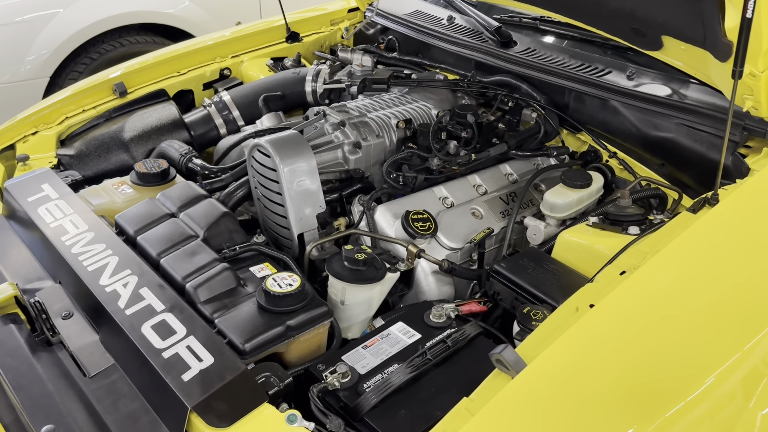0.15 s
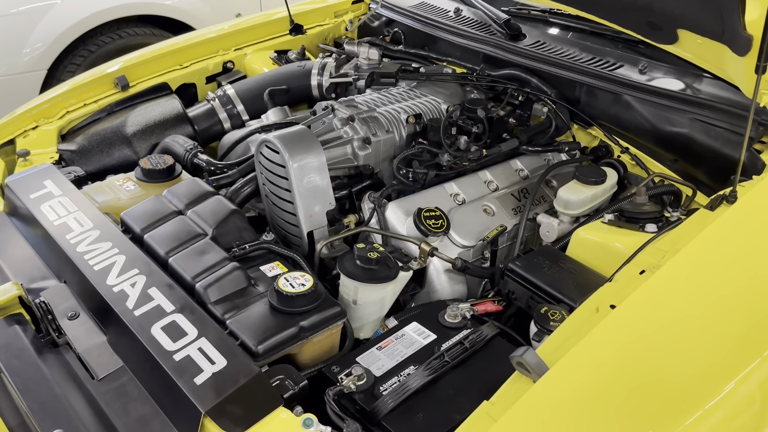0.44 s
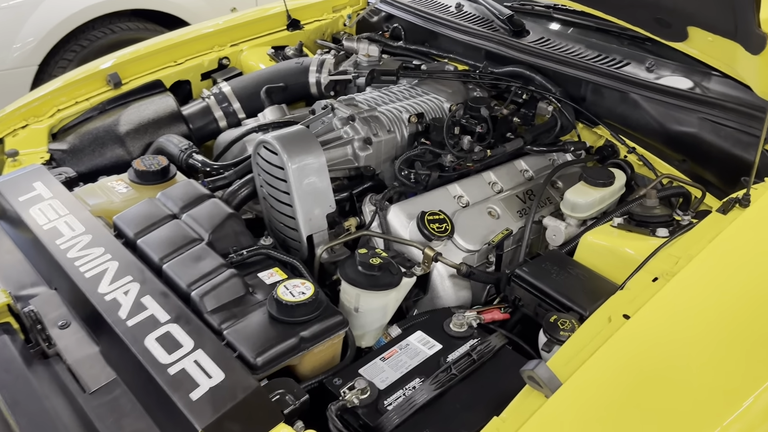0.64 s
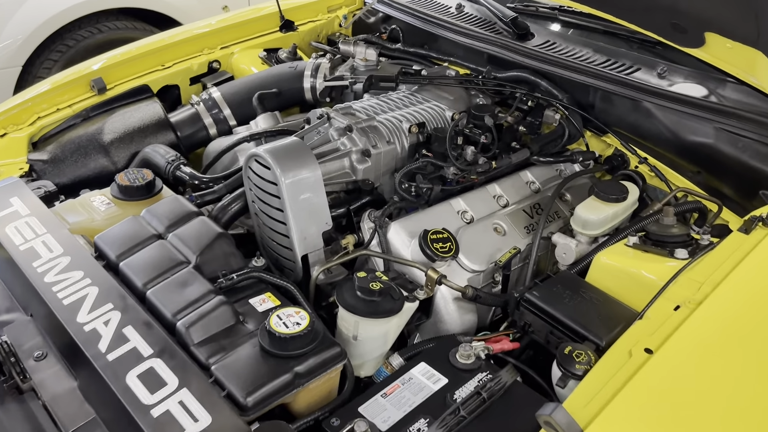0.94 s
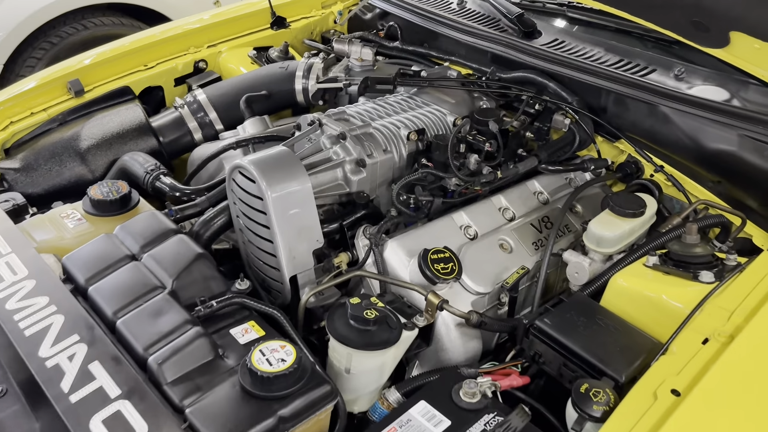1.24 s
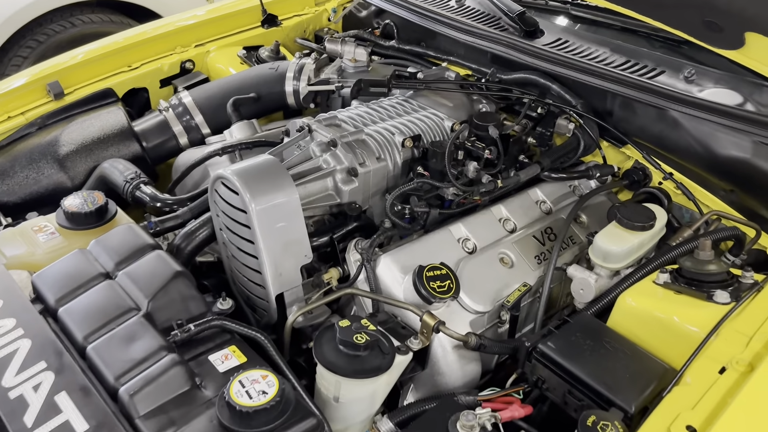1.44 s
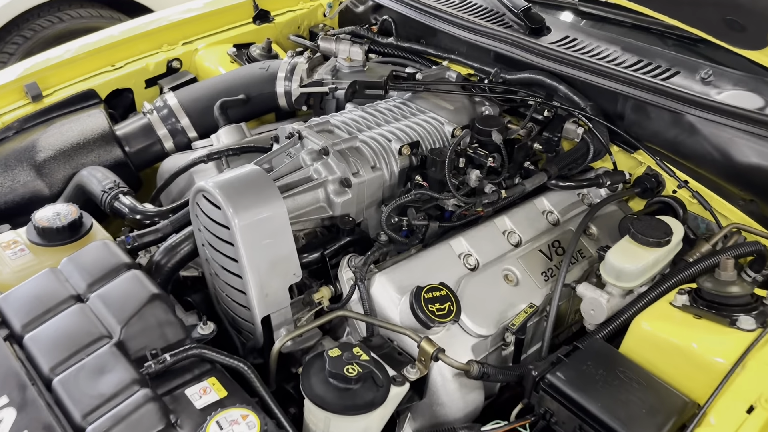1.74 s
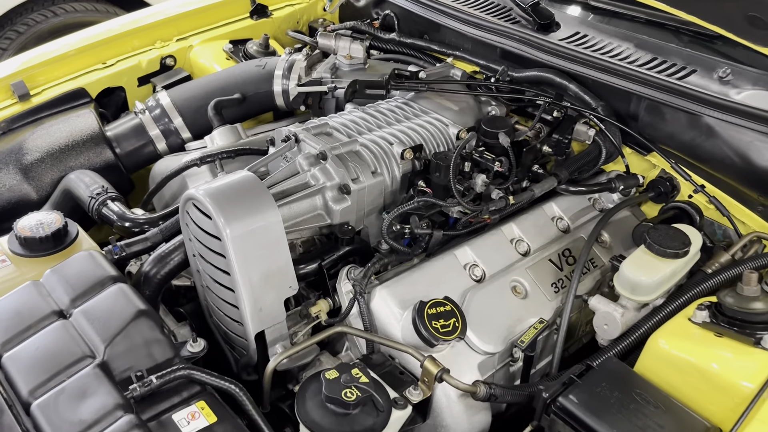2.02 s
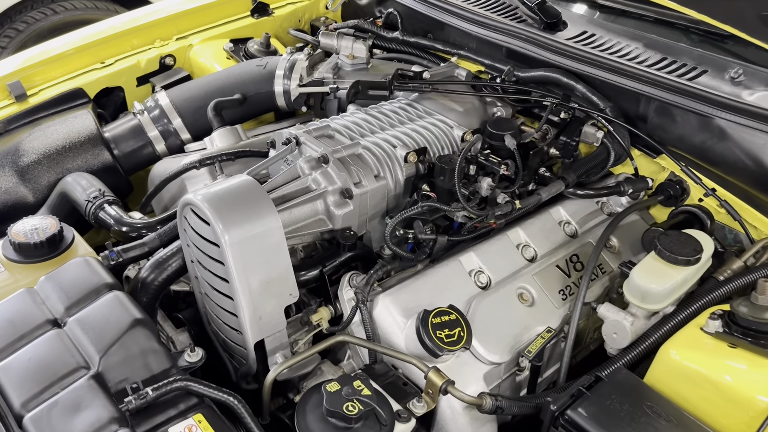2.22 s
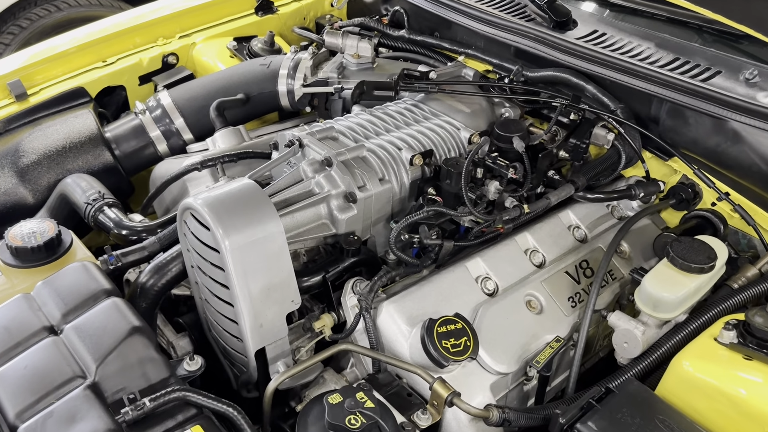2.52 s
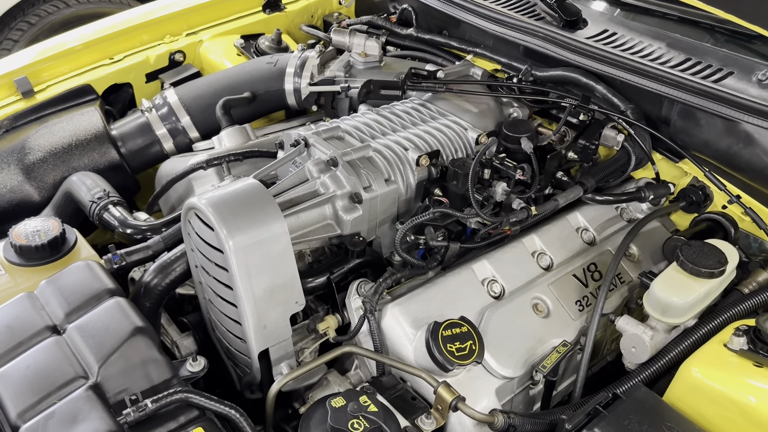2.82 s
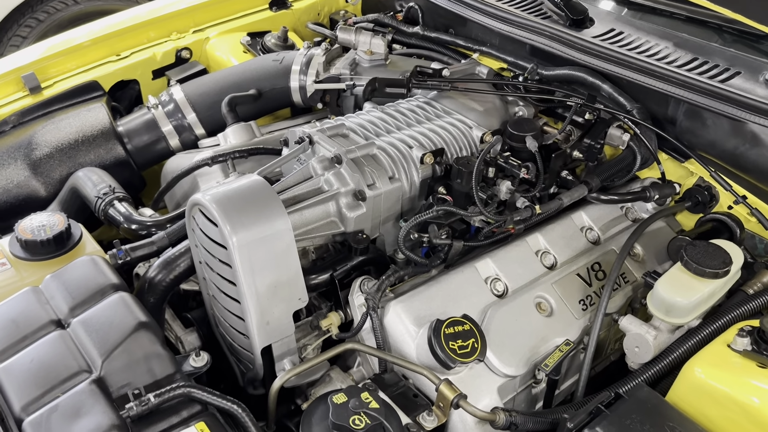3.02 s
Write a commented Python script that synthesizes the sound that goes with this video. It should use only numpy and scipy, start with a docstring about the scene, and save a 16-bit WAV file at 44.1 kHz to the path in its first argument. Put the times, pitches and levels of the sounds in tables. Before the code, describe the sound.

An eight-cylinder car engine drops from fast idle to slow idle, rumbling, whirring and ticking.

```python
"""In a closed garage, heard over the open bay, an eight-cylinder engine sinks from fast to slow idle.
Exhaust orders are sines sliding through pipe resonances, with a low room hum beside them.
Fan, belts and intake are coloured noise; random knocks ring the housings; injectors are bright bursts.
A belt-driven whine falls with the speed, and late knocks ring the valve cover.
Two close microphone ports give the treble a phase twist."""
import sys
import numpy as np
from scipy import signal
from scipy.fft import rfft, irfft, next_fast_len
from scipy.io import wavfile

SR = 44100
rng = np.random.default_rng(int(sys.argv[2]) if len(sys.argv) > 2 else 0)


def pcm_store(signal):
    """Save signal as 16-bit PCM."""
    levels = np.round(np.clip(np.atleast_2d(signal), -1, 1) * 32767)
    wavfile.write(sys.argv[1], SR, levels.astype(np.int16).T)


def gain_from_db(level_db):
    """Convert decibel levels to linear amplitude factors (20 dB per decade)."""
    decades = np.asarray(level_db, float) / 20
    return 10 ** decades


N = 139797
LEFT_RIGHT = np.array([[.5], [-.5]])  # splits a left-minus-right difference evenly


def rms_one(x):
    """Normalization: scale to rms 1."""
    return x / np.sqrt(np.mean(x ** 2) + 1e-20)


def in_time(rows):
    """Linear interpolation: table columns joined by straight lines, per sample."""
    s, *columns = np.transpose(rows)
    return [np.interp(np.arange(N) / SR, s, c) for c in columns]


def at_hz(points, hz):
    """Logarithmic pitch scale: read a spectrum by straight lines over log frequency."""
    p = np.array(points)
    return np.interp(np.log(np.maximum(hz, 1)), np.log(np.maximum(p[:, 0], 1)), p[:, 1])


def drift(corner_hz):
    """Low-passed noise: a slow random wander about zero, of rms 1."""
    step = 40  # samples between drawn values
    r = np.exp(-2 * np.pi * corner_hz * step / SR)
    noise = rng.standard_normal(N // step + 2002)
    slow = signal.lfilter([1], [1, -2 * r, r * r], noise)[2000:]  # filter start-up left out
    return np.interp(np.arange(N) / step, np.arange(len(slow)), rms_one(slow))


# coherence of the two ports: pitch_hz [Hz], alike [share of power]
PORTS_ALIKE = [(60, 0.99), (140, 0.96), (250, 0.71), (500, 0.78), (1000, 0.66), (2000, 0.37), (4000, 0.56),
               (6500, 0.26), (8000, 0.54), (9500, 0.78)]
# the same for the highest treble, almost fully shared: pitch_hz [Hz], alike [share of power]
PORTS_ALIKE_TOP = [(10500, .99), (13500, 1), (16000, 1)]
# phase difference of the ports: pitch_hz [Hz], left_lead [radians]
PORT_TWIST = [(0, 0), (1120, 0.74), (2500, 7.5), (4740, 7), (7060, 8), (7410, 12), (8180, 11), (8870, 12),
              (9600, 11)]
# the same for the highest treble: pitch_hz [Hz], left_lead [radians]
PORT_TWIST_TOP = [(10400, 10.3), (11250, 9.425), (11900, 8.8), (13900, 6.33), (15100, 6.26), (15500, 5.5),
                  (16500, 5.6)]
# level difference of the ports: pitch_hz [Hz], left_minus_right_db [dB]
PORT_BALANCE = [(60, 2), (130, 3), (290, -2), (640, 3), (1410, 2), (3100, -0.5), (6820, 2.5), (15000, -1)]


def at_ports(near, scattered, spectrum):
    """Partial coherence: colour a source, twist its phase between ports, replace part by scattered sound."""
    size = next_fast_len(N)
    hz = np.arange(size // 2 + 1) * SR / size
    alike = np.clip(at_hz(PORTS_ALIKE + PORTS_ALIKE_TOP, hz), 0, 1)
    twist = np.interp(hz, *np.transpose(PORT_TWIST + PORT_TWIST_TOP))
    shared = np.sqrt(alike) * rfft(near, size) * np.exp(1j * LEFT_RIGHT * twist)
    separate = np.sqrt(1 - alike) * rfft(scattered, size)
    balance_db = at_hz(PORT_BALANCE, hz) * (hz < 9500)
    colour = gain_from_db(at_hz(spectrum, hz) + LEFT_RIGHT * balance_db)
    return irfft((shared + separate) * colour, size)[:, :N]


# resonances of exhaust pipe and garage: pitch_hz [Hz], gain_db [dB]
PIPE_RESPONSE = [(30, 21.5), (45, -13), (70, -24), (88, -1), (100, 10.5), (112, 6.5), (125, 4), (140, -4),
                 (155, -7.5), (168, -6), (178, 1.5), (186, 10), (195, 10), (205, 7.5), (218, 1), (232, 4),
                 (250, -3.5), (270, -0.1), (290, 1.5), (303, 2.7), (330, -18), (480, -6.5)]


def pipe_phase(hz):
    """Minimum phase: a causal pipe's phase is the Hilbert transform of its log gain."""
    grid_hz = np.arange(-1024, 1024)
    log_gain = np.log(gain_from_db(at_hz(PIPE_RESPONSE, abs(grid_hz))))
    return -np.interp(hz, grid_hz, signal.hilbert(log_gain).imag)


# exhaust as heard while the microphone moves:
# start_s [s], firing_db [dB], second_harmonic_db [dB], others_db [dB added to all the other orders]
EXHAUST_LEVEL = [(0, -13.5, -29, 3.5), (.15, -40, -19.5, 0.5), (.22, -47, -30, 2), (.28, -18.5, -28, 3),
                 (.35, -37, -30, 2), (.6, -31, -26.5, -1.5), (1.1, -35, -29.5, -1.5), (1.35, -36, -22, -3),
                 (1.6, -34.5, -19.5, -2.5), (2.2, -31, -17, -2), (2.55, -47, -18, -2),
                 (3.17, -47, -17.5, -1)]
# exhaust bank of each firing in turn: bank [+1 or -1]
FIRING_BANK = [1, -1, 1, 1, -1, 1, -1, -1]
# the other exhaust orders, uneven-firing ones and higher firing harmonics:
# order [periods per engine cycle]
OTHER_ORDER = [5, 9, 10, 11, 12, 13, 14, 15, 17, 18, 19, 20, 21, 22, 23, 24, 25, 26, 27, 28, 29, 32]
# their levels before the pipe response: level_db [dB]
OTHER_ORDER_DB = [-38.5, -40, -41.5, -41, -56, -37, -44.5, -63, -54, -51.5, -34.5, -50, -31, -43, -46.5,
                  -38, -44, -49, -35.5, -59, -36, -36.5]
BANK_SHARE, START_CYCLE = .45, 0.1276  # bank imbalance (ratio), starting offset (cycles)
WAVER_DB, WAVER_RAD, WAVER_HZ = 1.5, .25, 5  # rms level and phase waver of the other orders, its corner
SMEAR_RAD = 0.02523  # pipes spread each pulse: phase lag grows with the square of the order


def exhaust(rate, cycle, firing_db, second_db, others_db):
    """Fourier series: sines at cycle orders, phased by the two banks, wavering apart at the ports."""
    bank_phase = np.angle(np.fft.fft(1 + BANK_SHARE * np.array(FIRING_BANK)))
    orders = [(8, firing_db, 0.098), (16, second_db, 0.16)]  # order, level, share of the waver
    for order, db in zip(OTHER_ORDER, OTHER_ORDER_DB):
        orders.append((order, db + others_db + at_hz(PIPE_RESPONSE, order * rate / 8), 1))
    out = np.zeros((2, N))
    for order, db, waver in orders:
        hz = order * rate / 8
        phase = 2 * np.pi * order * (cycle - START_CYCLE) + bank_phase[order % 8]
        phase += pipe_phase(hz) - SMEAR_RAD * order ** 2
        phase += waver * WAVER_RAD * drift(WAVER_HZ)
        gain = np.sqrt(2) * gain_from_db(db + waver * WAVER_DB * drift(WAVER_HZ))
        apart = np.sqrt(1 - np.clip(at_hz(PORTS_ALIKE, hz), 0, 1)) * drift(2.25)
        out -= gain * np.cos(phase + apart * LEFT_RIGHT)
    return out


# the garage hums on one note while firings pass near it: start_s [s], level_db [dB]
BOOM_LEVEL = [(0, -15), (0.154, -11.5), (.178, -45), (.28, -13), (.34, -42), (.5, -67)]
BOOM_HZ = 98


def boom():
    """Room mode: a low air resonance of fixed pitch, a sine that swells and fades."""
    level_db, = in_time(BOOM_LEVEL)
    seconds = np.arange(N) / SR - .0024
    return -np.sqrt(2) * gain_from_db(level_db) * np.cos(2 * np.pi * BOOM_HZ * seconds)


# rush level and balance, each also followed elsewhere about its mean:
# start_s [s], level_db [dB before RUSH_DB], left_minus_right_db [dB before its mean is removed]
BAY_LEVEL = [(0.0, -28, 7), (0.26, -31, 6.5), (1.27, -33, 6), (2.3, -31.5, 6.5), (3.17, -31, 7)]
# colour of fan, belts and intake: pitch_hz [Hz], fast_idle_db, slow_idle_db [relative dB per Hz]
RUSH_COLOUR = [(25, -32, -30), (45, -38, -23), (70, 6, -12), (100, 5, -6), (140, 10.5, 5), (189, 13, -4),
               (240, 5, -6.5), (320, -4, -7.5), (450, 3.5, -6), (614, -1, 0), (750, -8, -5),
               (1040, -4, -7.5), (1570, -6.5, -5), (1860, -10.5, -17.5), (2520, -14, -12.5),
               (3970, -13.5, -16), (4570, -17, -19), (5700, -21, -20), (7100, -21.5, -17.5),
               (8460, -20.5, -21.5), (10900, -27.5, -25.5), (14000, -23.5, -25), (16000, -26, -19)]
RUSH_DB, RUSH_THROB = -0.5, 0.032  # level trim (dB), depth of the throb (ratio)


def rush(rate, cycle):
    """Amplitude-modulated turbulence: noise throbs faintly at each firing, its colour following speed."""
    throb = 1 + RUSH_THROB * np.cos(2 * np.pi * 8 * cycle)
    noise = rng.standard_normal((3, N)) * throb
    fast = np.sqrt((rate - rate.min()) / np.ptp(rate))
    colour = np.array(RUSH_COLOUR)
    sound = fast * at_ports(noise[0], noise[1:], colour[:, :2])
    sound += (1 - fast) * at_ports(noise[0], noise[1:], colour[:, ::2])
    midband = signal.butter(4, [400, 7000], "band", fs=SR, output="sos")
    reference = np.std(signal.sosfilt(midband, sound.mean(0)))  # levels refer to this band
    return sound / reference * gain_from_db(in_time(BAY_LEVEL)[0] + RUSH_DB)


# covers and housings that the valve gear keeps ringing:
# pitch_hz [Hz], width_hz [Hz], level_db [dB before the port balance and the level curve]
HOUSING_MODES = [(300, 13.5, -39), (483.6, 13.4, -45.5), (605, 25, -45), (745, 36, -43), (867, 38, -43.5),
                 (1410, 45, -60), (1872, 36, -47.5), (2560, 34, -49.5), (3206, 55, -51), (4717, 69, -53.5),
                 (8210, 67, -52.5)]
KNOCKS_PER_S, CLATTER_SLOPE_DB_PER_S = 200, -0.5  # mean knock rate, steady fall in level


def clatter():
    """Modal resonance: dense random knocks of uneven strength ring each housing."""
    out = np.zeros((3, N))
    for hz, width_hz, db in HOUSING_MODES:
        struck = rng.random((3, N)) < KNOCKS_PER_S / SR
        knocks = struck * rng.standard_normal((3, N)) * gain_from_db(drift(6.8))  # 1 dB rms slow variation
        r = np.exp(-np.pi * width_hz / SR)
        poles = [1, -2 * r * np.cos(2 * np.pi * hz / SR), r * r]
        out += gain_from_db(db) * rms_one(signal.lfilter([1, 0, -1], poles, knocks + 1e-18))
    level_db = in_time(BAY_LEVEL)[0]
    slope_db = CLATTER_SLOPE_DB_PER_S * (np.arange(N) - N / 2) / SR
    flat = [(20, 0), (20000, 0)]
    return at_ports(out[0], out[1:], flat) * gain_from_db(level_db - level_db.mean() + slope_db)


# whine strength before its random wobble: start_s [s], level_db [dB]
WHINE_STRENGTH = [(0, -42), (.05, -39), (.11, -58), (.17, -35), (.2, -46), (.36, -45), (.52, -47),
                  (.6, -60), (.67, -45), (.9, -51), (1.5, -54.5), (2.3, -48), (3.17, -50)]
WHINE_ORDER, WHINE_WAVER_RAD = 207, .35  # periods per engine cycle at slowest idle, rms phase waver
SLIP_PER_HZ = .105  # the belt slips more at speed: order lost per extra firing/s


def whine(rate):
    """Rotational tone: a belt-driven rotor sings at a high order of the cycle, less the belt slip."""
    order = WHINE_ORDER - SLIP_PER_HZ * (rate - rate.min())
    turns = np.cumsum(order * rate) / SR / 8
    phase = 2 * np.pi * turns + WHINE_WAVER_RAD * drift(32)
    wobble = gain_from_db(in_time(WHINE_STRENGTH)[0] + 1.5 * drift(12))
    return np.sqrt(2) * wobble * np.cos(phase + 0.8 * LEFT_RIGHT)  # left leads by 0.8 rad


# injectors in firing order: opening_db, closing_db [relative dB before a random spread]
INJECTOR_TICKS = [(1, -2), (0, 0), (-9, -9), (-4, -5), (-6, -7), (-5, -7), (-1, -4), (-7, -6)]
# nearer as the microphone leans in: start_s [s], level_db [relative dB]
TICK_NEARNESS = [(0, -1), (.8, 2), (1.6, 4), (3.17, 7.5)]
# colour of the ticks: pitch_hz [Hz], level_db [relative dB per Hz]
TICK_COLOUR = [(3000, -35), (6000, -23), (8000, -4), (10000, 6), (13000, 7), (16000, -12)]
OPEN_S, TICK_DECAY_S, TICK_SPREAD_DB = .003, .002, 1.8  # time held open, burst time constant, rms spread
LEAD_CYCLE, LEAD_PER_HZ = .005, .008  # opening lead (cycles), and its growth per extra firing/s


def injectors(rate, cycle):
    """Impulsive excitation: each opening and shutting is a decaying burst of bright noise."""
    lead = LEAD_CYCLE + LEAD_PER_HZ * (rate - rate.min())
    slot = np.floor(8 * (cycle + lead)).astype(int)
    opens = np.flatnonzero(np.diff(slot) > 0)
    spread_db = TICK_SPREAD_DB * rng.standard_normal((400, 2))[:len(opens)]
    db = np.array(INJECTOR_TICKS)[slot[opens + 1] % 8] + spread_db
    hits = np.zeros(N + SR)
    hits[opens] = gain_from_db(db[:, 0])
    hits[opens + int(OPEN_S * SR)] = gain_from_db(db[:, 1])
    r = np.exp(-1 / (TICK_DECAY_S * SR))
    envelope = signal.lfilter([1 - r], [1, -r], hits[:N] + 1e-18)
    burst = envelope * rng.standard_normal((3, N))
    return at_ports(burst[0], burst[1:], TICK_COLOUR) * gain_from_db(in_time(TICK_NEARNESS)[0])


# harder knocks on the valve cover: start_s [s], level_db [dB of the strike before the band filter]
COVER_KNOCKS = [(2.28, -32), (2.55, -25), (2.71, -26), (2.84, -24), (2.89, -26), (2.94, -25), (3.13, -28.5)]
COVER_HZ, COVER_T60_S = 729.4, 0.096  # pitch, time for the resonator to fall 60 dB


def cover():
    """Damped oscillation: single dull knocks set the valve cover ringing."""
    s, db = np.transpose(COVER_KNOCKS)
    hits = np.zeros(N)
    hits[(s * SR).astype(int)] = gain_from_db(db)
    r, w = gain_from_db(-60 / (COVER_T60_S * SR)), 2 * np.pi * COVER_HZ / SR
    ring = signal.lfilter([0, np.sin(w)], [1, -2 * r * np.cos(w), r * r], hits + 1e-18)
    band = signal.butter(1, [COVER_HZ - 40, COVER_HZ + 40], "band", fs=SR, output="sos")
    return signal.sosfilt(band, ring)


# engine speed: start_s [s], rate [firings per s]
ENGINE_SPEED = [(0.0, 97.0), (0.07, 95.5), (0.13, 93.12), (0.26, 87.44), (0.4, 83.54), (0.53, 80.09),
                (0.66, 77.16), (0.79, 73.53), (0.92, 69.84), (1.05, 68.91), (1.19, 67.9), (1.45, 66.15),
                (1.58, 64.41), (1.84, 63.89), (2.11, 62.9), (2.37, 61.72), (2.5, 60.6), (2.9, 61.01),
                (3.17, 60.11)]
# exhaust balance: start_s [s], left_minus_right_db [dB]
EXHAUST_BALANCE = [(0, -1.1), (1, .2), (1.4, 1.2), (1.8, 0.5), (3.17, 0.5)]


def scene():
    """Superposition: one falling speed times the engine parts; balance shifts as the microphone moves."""
    rate, = in_time(ENGINE_SPEED)
    cycle = np.cumsum(rate) / SR / 8  # eight firings per engine cycle
    pipes = exhaust(rate, cycle, *in_time(EXHAUST_LEVEL))
    pipes = pipes * gain_from_db(in_time(EXHAUST_BALANCE)[0] * LEFT_RIGHT)
    pan_db = in_time(BAY_LEVEL)[1]
    bay = rush(rate, cycle) + clatter() + whine(rate) + cover()
    bay = bay * gain_from_db((pan_db - pan_db.mean()) * LEFT_RIGHT)
    return pipes + boom() + bay + injectors(rate, cycle)


def top_cut(x):
    """Nothing passes above the cut-off."""
    return signal.sosfilt(signal.butter(12, 16100, fs=SR, output="sos"), x)


def record(dry):
    """Band limiting: the bass is rolled off, and the band ends sharply near 16 kHz."""
    mix = signal.sosfilt(signal.butter(2, 30, "high", fs=SR, output="sos"), dry)
    mix = signal.sosfilt(signal.cheby2(12, 60, 16450, fs=SR, output="sos"), mix)
    return top_cut(mix)


dry = scene()
out = record(dry)
pcm_store(out)
```